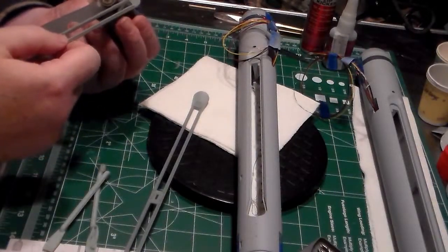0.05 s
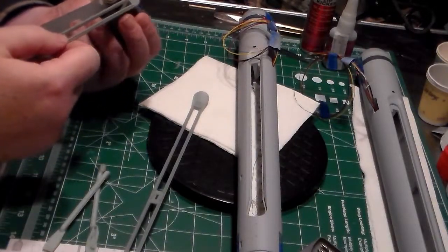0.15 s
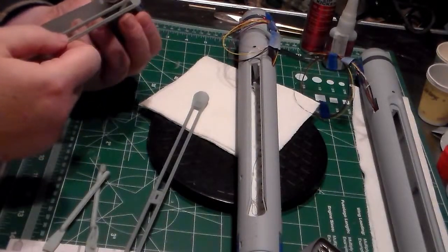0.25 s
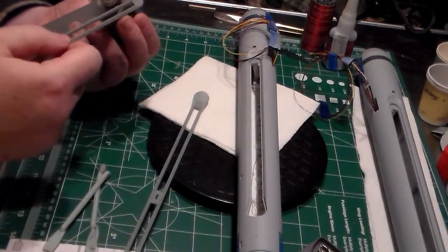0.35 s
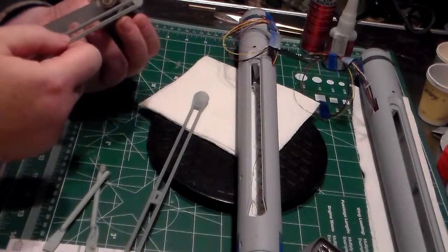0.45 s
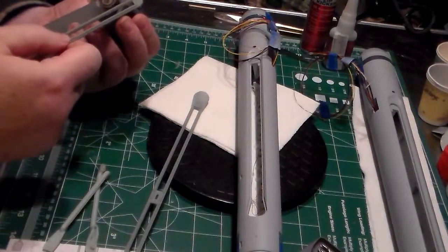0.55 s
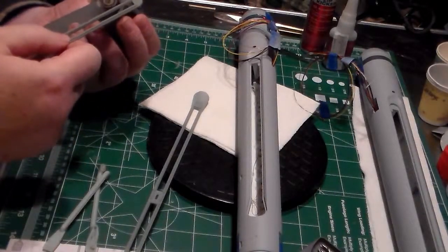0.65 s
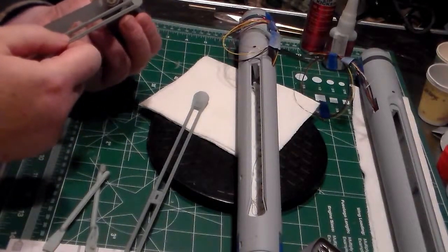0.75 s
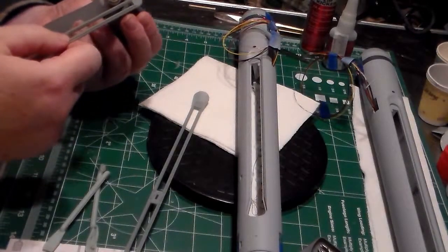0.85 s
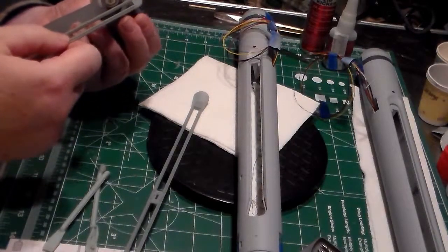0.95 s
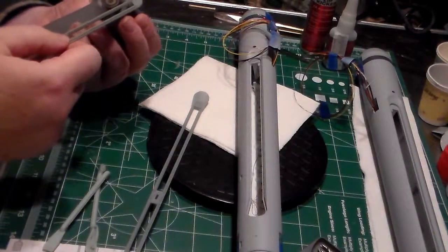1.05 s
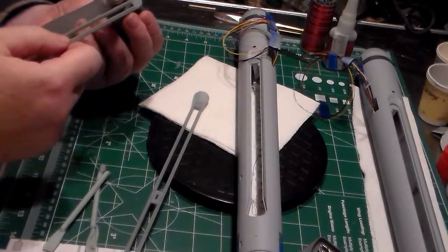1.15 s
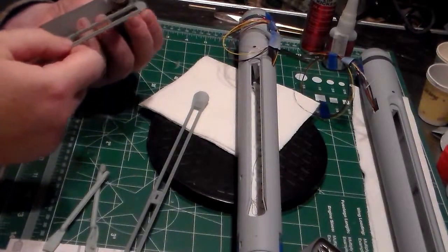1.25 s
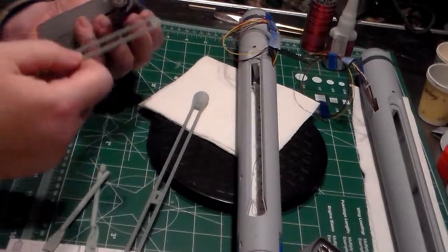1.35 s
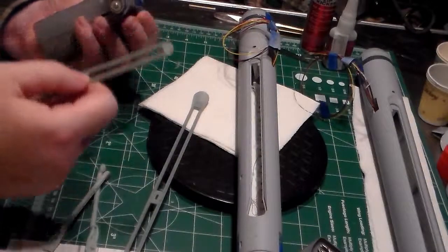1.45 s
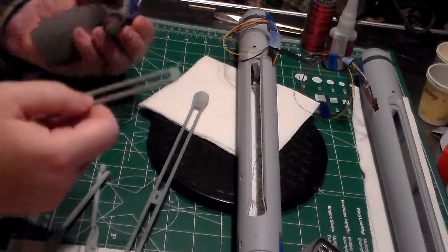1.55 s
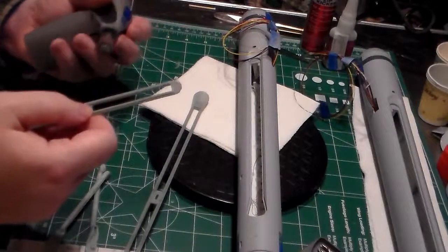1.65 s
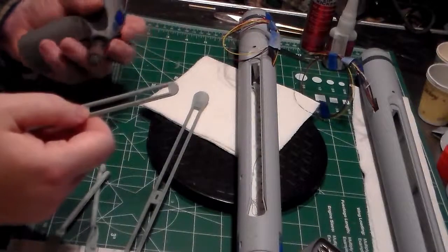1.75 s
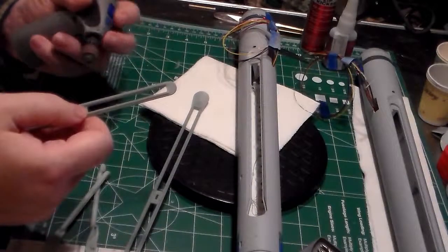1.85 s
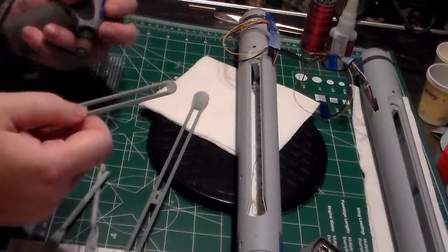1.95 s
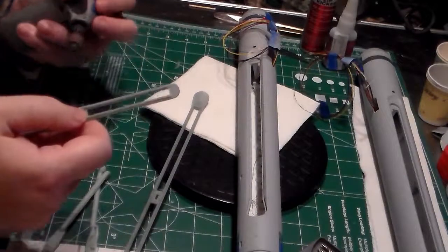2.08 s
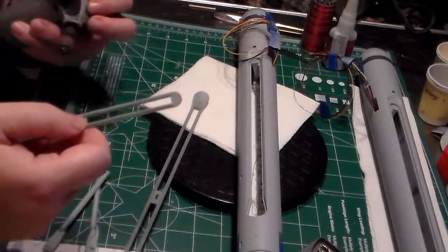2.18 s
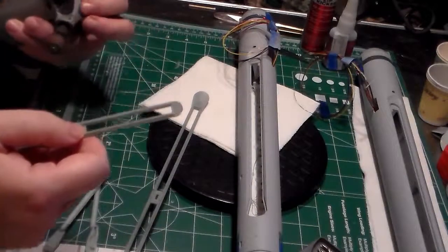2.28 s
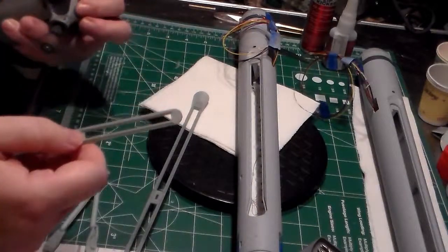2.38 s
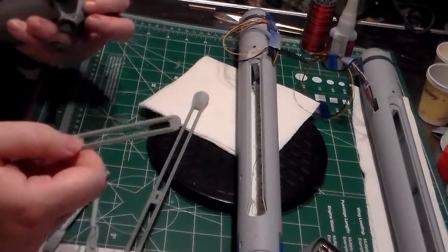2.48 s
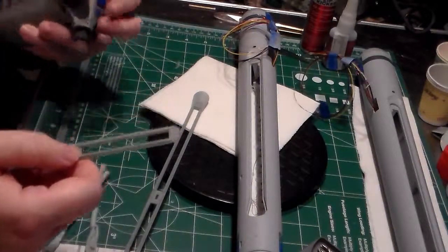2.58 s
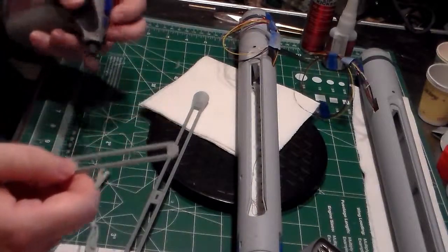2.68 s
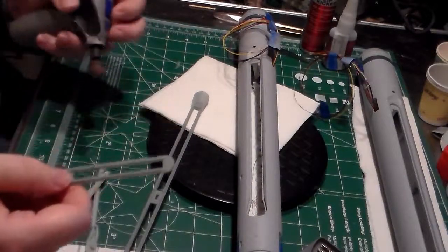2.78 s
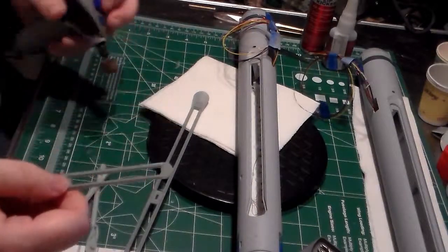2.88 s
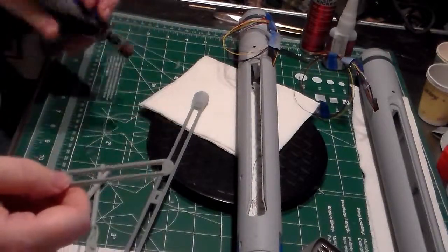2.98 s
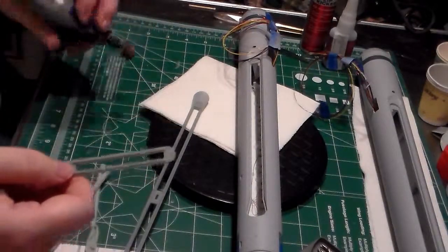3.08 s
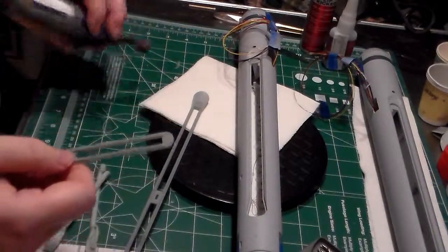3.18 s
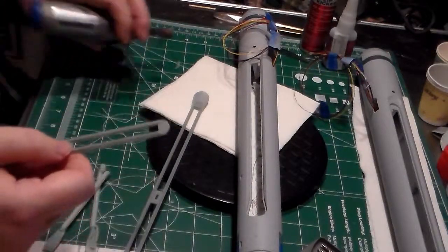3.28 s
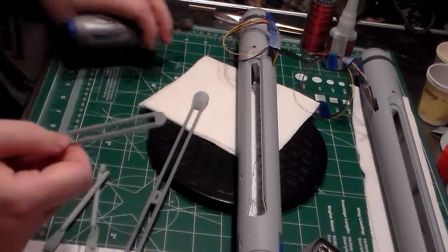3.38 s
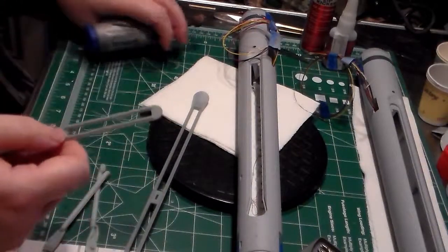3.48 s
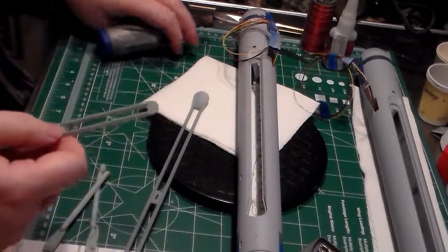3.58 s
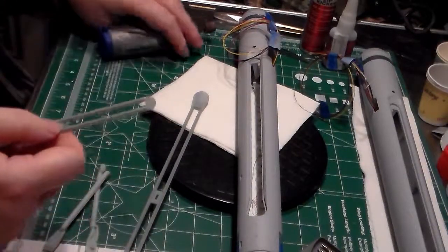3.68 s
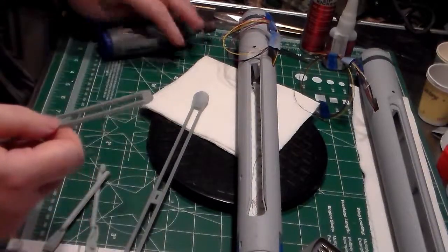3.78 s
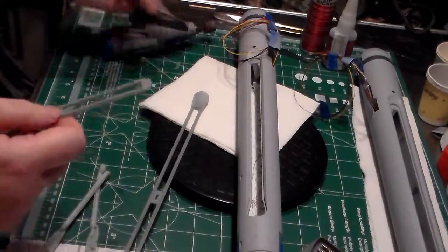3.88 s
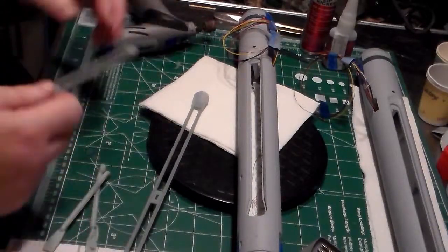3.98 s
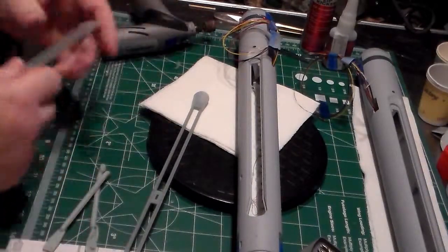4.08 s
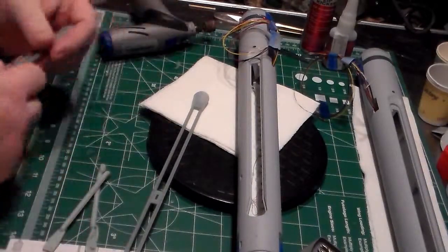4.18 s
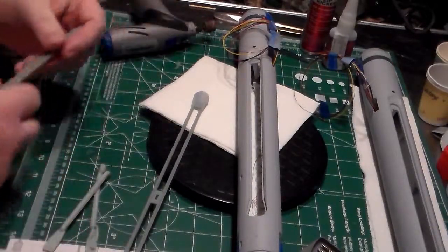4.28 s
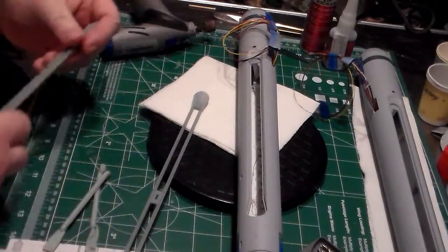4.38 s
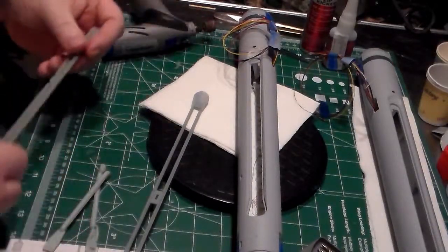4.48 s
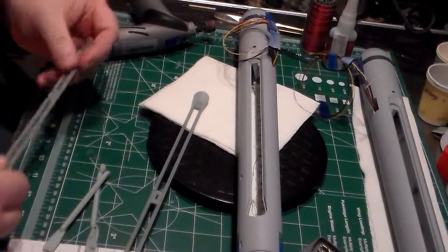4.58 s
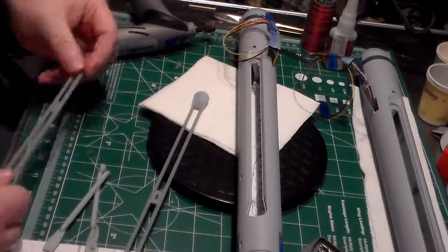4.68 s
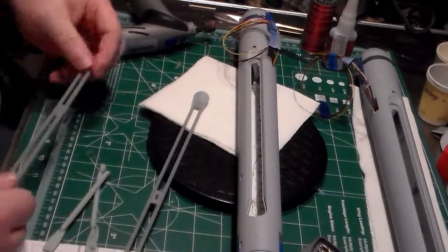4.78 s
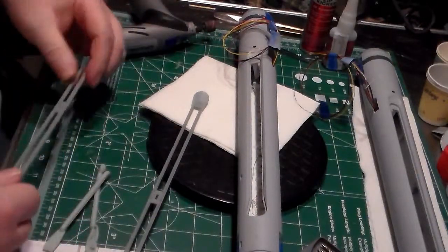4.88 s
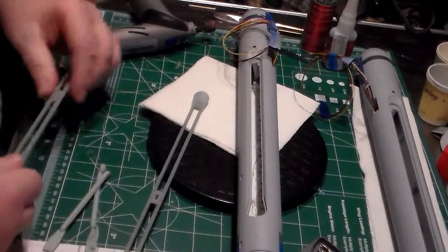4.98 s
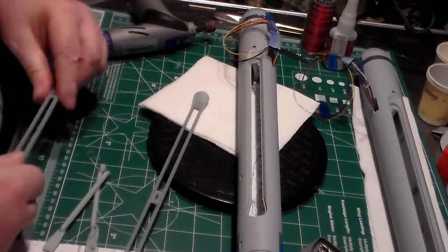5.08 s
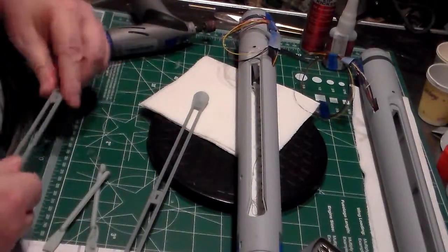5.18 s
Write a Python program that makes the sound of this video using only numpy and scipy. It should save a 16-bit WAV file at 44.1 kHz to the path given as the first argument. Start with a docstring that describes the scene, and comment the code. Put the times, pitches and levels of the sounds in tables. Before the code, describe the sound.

A small rotary tool whines steadily, rasping plastic in brief touches, then whirs down to a stop and is laid on a bench with knocks.

```python
"""Rotary tool on a workbench

A small rotary tool runs; its sanding drum touches a plastic part a few times and sets it ringing.
The tool is turned away and switched off, and its shaft harmonics, howl and rattle fall with the speed.
It is laid on the bench with two main knocks, which excite modes of the housing and the bench.
Fingers slide over the plastic in grains of filtered noise; the small room hums faintly throughout."""
import sys
import numpy as np
from scipy import signal
from scipy.fft import rfft, irfft, next_fast_len
from scipy.io import wavfile

SR = 44100
rng = np.random.default_rng(int(sys.argv[2]) if len(sys.argv) > 2 else 0)


def to_wav(s):
    """Save 16-bit WAV."""
    ch = np.atleast_2d(s).T  # columns
    pcm = np.round(np.clip(ch, -1, 1) * 32767)  # PCM
    wavfile.write(sys.argv[1], SR, pcm.astype(np.int16))


N = 231341
TIME = np.arange(N) / SR
OFF_S = 2.42   # the tool is switched off
CUTOFF_HZ = 14300   # upper limit of the sound

# left-right correlation of the sound field: f/Hz, correlation [-1 to 1]
LIKENESS = [(60, 0.69), (120, 0.57), (230, 0.98), (460, 0.99), (910, 0.97), (1800, 1), (3560, 0.94),
            (7020, 0.38), (13900, 0.15)]
# spectrum of grinding and knocking contacts: f/Hz, relative level/dB
GRIT = [(300, -25), (900, -15.5), (2000, -6), (2800, -3), (3600, 2.5), (5000, -3), (7500, -5), (9000, -8),
        (14000, -10.5)]


def from_db(db):
    """The decibel law: amplitude gain of a level in dB."""
    return 10 ** (np.asarray(db) / 20)


def rms_one(x):
    """Normalization of power: the signal scaled to unit rms."""
    return x / np.sqrt(np.mean(x ** 2) + 1e-20)


def in_time(rows):
    """Linear interpolation of (time, value) rows at every sample."""
    return np.interp(TIME, *np.transpose(rows))


def at_hz(points, hz):
    """A spectrum interpolated on a logarithmic frequency axis."""
    points = np.array(points)
    return np.interp(np.log(np.maximum(hz, 1)), np.log(points[:, 0]), points[:, 1])


def drift(rate):
    """Band-limited random fluctuation: normal values, `rate` a second, joined by straight lines."""
    return np.interp(TIME * rate, np.arange(4096), rng.standard_normal(4096))


def swell(x, centre, width):
    """Gaussian window: a smooth rise to 1 at the centre, and back."""
    return np.exp(-(2 * (x - centre) / width) ** 2)


def noise(spectrum, likeness=LIKENESS):
    """Spectral shaping of random noise: mid and side mixed to a given correlation; stereo, rms 1."""
    size = next_fast_len(N)
    hz = np.arange(size // 2 + 1) * SR / size
    mid, side = rfft(rng.standard_normal((2, size)))
    alike = np.clip(at_hz(likeness, hz), -1, 1)
    both = np.sqrt(1 + alike) * mid + np.sqrt(1 - alike) * side * [[1], [-1]]
    return rms_one(irfft(both * from_db(at_hz(spectrum, hz)), size)[:, :N])


def partial(phase, hz, rough, wander):
    """Random complex modulation: a stereo tone of rms 1 shifts in each ear, as with moving reflections."""
    # level of left minus right: f/Hz, level/dB
    lean = [(60, -0.5), (130, -3), (280, -3.5), (620, -1), (1350, 0.5), (2930, -0.5), (6370, -1),
            (13900, 0)]
    step = 64   # samples between modulation values
    t = TIME[::step]

    def chance(rate):
        values = rng.standard_normal((2, 1024))
        return np.interp(t * rate, np.arange(values.shape[1]), values[0] + 1j * values[1])

    # hz sets only the stereo image; the pitch is in the phase
    alike = np.clip(at_hz(LIKENESS, hz), 0, 1)
    mid = 1 + wander * chance(6.21) + rough * chance(70)
    side = np.sqrt((1 - alike) / (1 + alike)) * chance(3.04)
    balance = from_db(at_hz(lean, hz) * np.array([[.5], [-.5]]))
    both = (mid + side * np.array([[1], [-1]])) * balance
    both = both / np.sqrt(np.mean(abs(both) ** 2) / 2)
    both = np.repeat(both, step, axis=1)[:, :N]
    phase = (phase % (2 * np.pi)).astype(np.float32)
    return both.real * np.cos(phase) + both.imag * np.sin(phase)


def ring(x, modes):
    """Modal resonance: each mode answers with a dying sine, signs alternating."""
    out = 0
    for k, (hz, db, t60) in enumerate(modes):
        radius = from_db(-60 / (t60 * SR))   # decay per sample
        w = 2 * np.pi * hz / SR
        poles = [1, -2 * radius * np.cos(w), radius * radius]
        mode = signal.lfilter([0, np.sin(w)], poles, x + 1e-18)
        out = out + (-1) ** k * from_db(db) * mode
    return out


def grains(per_s, spread_db, life_s):
    """Shot noise: decaying contacts of uneven size at random moments make an envelope of rms 1."""
    sizes = from_db(spread_db * np.minimum(rng.exponential(1, N), 3))
    contacts = (rng.random(N) < per_s / SR) * sizes
    return rms_one(signal.lfilter([1], [1, -np.exp(-1 / (life_s * SR))], contacts + 1e-18))


def flare(order):
    """Selective emphasis: added gain of one harmonic that fades in, holds and fades out."""
    # while the grip or the vents' angle favours a harmonic: start t/s, end t/s, shaft multiple, level/dB
    flares = [(.43, .95, 15, -37), (0.91, 1.57, 21, -42.5), (.92, 1.62, 10, -50), (.92, 1.622, 7, -48.5),
              (1.22, 1.302, 5, -43), (1.418, 1.8, 50, -42), (1.66, 1.976, 7, -36.5),
              (1.85, 2.247, 18, -36.5)]
    fade_s = .06
    out = 0
    for start, end, k, db in flares:
        if round(k) == order:
            inside_s = np.minimum(TIME - start, end - TIME)
            out = out + from_db(db) * np.clip(inside_s / fade_s + .5, 0, 1)
    return out


def background():
    """Superposition of steady sinusoids, wavering in phase, on weakly correlated room noise."""
    # hum and faint fan tones: f/Hz, level/dB
    hum_tones = [(32.3, -54), (59.2, -58), (118.4, -60.5), (479.1, -71.5), (662.1, -67.5), (899.0, -66.5),
                 (1023, -71)]
    # spectrum of the room noise: f/Hz, relative level/dB
    room_colour = [(12, -35), (20, -5.5), (69, -4), (88, -17.5), (123, -10), (149, -13.5), (207, -13),
                   (231, -13), (446, -19), (484, -15), (751, -19.5), (886, -20), (1070, -20), (1860, -21.5),
                   (14200, -31.5)]
    # its left-right correlation: f/Hz, correlation [-1 to 1]
    room_likeness = [(60, 0.4), (180, 0.38), (530, 0.42), (1570, 0.46), (4670, 0.11), (13900, 0.43)]
    room_db = -52
    hum = 0
    for hz, db in hum_tones:
        phase = 2 * np.pi * hz * TIME + rng.uniform(0, 2 * np.pi) + 0.24 * drift(4.3)
        hum = hum + from_db(db) * np.sqrt(2) * np.sin(phase)
    hum = from_db(-3) * hum * from_db([[-.7], [.7]])   # the right ear hears more of it
    return hum + from_db(room_db) * noise(room_colour, room_likeness)


def whine(angle, shaft_hz, turn, slowing_db):
    """Harmonic series of rotation: clean low orders from the rotor, rougher high ones from the brushes."""
    # shaft harmonics with the tool facing and turned away: shaft multiple, relative level/dB
    facing = [(1, -23.5), (2, -16.5), (3, -10.5), (4, -12), (5, -4.5), (6, -6), (7, -11.5), (8, -13),
              (9, -16), (10, -16), (11, -15), (12, -8.5), (13, -8), (14, -10), (15, 4.5), (16, -3.5),
              (17, -2.5), (18, 0.5), (19, -3.5), (20, -11), (21, -5.5), (22, -6), (23, -6), (24, -14)]
    away = [(1, -22.5), (2, -23), (3, -10.5), (4, -14), (5, -9.5), (6, -14.5), (7, 0), (8, -11), (9, -7.5),
            (10, -0.5), (11, -14), (12, -3), (13, -13), (14, -14), (15, -14), (16, -2.5), (17, -1),
            (18, 3.5), (19, -4), (20, -11), (21, -9), (22, -7), (23, -31.5), (24, -8)]
    # spectrum of the brush harmonics: f/Hz, relative level/dB
    brush_colour = [(2940, -34), (5000, -4), (5650, -11), (6300, -0.5), (6910, -12), (8010, -11),
                    (9260, -9), (9750, 2), (10300, -4), (11200, -6.5), (11800, -5.5), (14200, -10.5)]
    facing_db, away_db, brush_db = -39.5, -39.5, -38.5
    beamed_orders = 7, 15, 18   # beamed from the vents, they arrive direct and steady
    rotor, count = 0, len(facing)
    for k, ((_, near_db), (_, far_db)) in enumerate(zip(facing, away), 1):
        level_db = (1 - turn) * (facing_db + near_db) + turn * (away_db + far_db)
        gain = np.hypot(from_db(level_db), flare(k))
        wander = .07 if k in beamed_orders else 0.45 * np.sqrt(k / count)
        # dB lost per dB of speed lost: high harmonics die first
        fade = from_db(slowing_db * (.9 + 0.81 * k))
        phase = k * angle + rng.uniform(0, 2 * np.pi)
        rotor = rotor + gain * fade * partial(phase, k * shaft_hz, rough=0.26 * k / count, wander=wander)
    brushes = 0
    for k in np.arange(count + 1, CUTOFF_HZ // shaft_hz):
        hz = k * shaft_hz
        phase = k * angle + rng.uniform(0, 2 * np.pi)
        tone = partial(phase, hz, rough=.5 * (hz / 9000) ** 2, wander=0.68)
        brushes = brushes + from_db(at_hz(brush_colour, hz) + rng.normal(0, 1.9)) * tone
    return rotor + rms_one(brushes) * from_db(brush_db + 2.2 * turn + 11 * slowing_db)


def controller(angle):
    """Amplitude-modulation sidebands: chopped current sings at a fixed pitch; the rotor adds side tones."""
    # carrier and sidebands: offset in shaft multiples, level/dB with the tool facing
    chopper = [(-3, -58.5), (-1, -57.5), (0, -45), (1, -61.5), (3, -52)]
    chopper_hz = 1512
    carrier = 2 * np.pi * chopper_hz * TIME
    tones = 0
    for k, db in chopper:
        tones = tones + from_db(db) * partial(carrier + round(k) * angle, chopper_hz, rough=0.094, wander=0.024)
    return tones * np.clip((OFF_S - TIME) / 0.0094, 0, 1)


def rush(angle, turn, coasting, slowing_db, shudder_db):
    """Modulated broadband noise: bearings and brushes swell once a turn; the whirling shaft rattles."""
    # bearing noise with the tool facing and turned away: f/Hz, relative level/dB
    air_facing = [(100, -34), (200, -34), (500, -22.5), (800, -17.5), (1200, -14.5), (1700, -9.5),
                  (2200, -12.5), (2700, -5), (3300, -4.5), (3700, -2), (4500, -6), (5200, -11),
                  (6300, -11.5), (7500, -17), (10000, -53)]
    air_away = [(150, -55), (250, -30), (409, -17), (539, -14), (597, -13), (833, -12), (991, -3.5),
                (1210, -7), (1470, -0.5), (1620, -5), (1900, -2), (2860, -4.5), (3450, -3.5), (6070, -13.5),
                (8000, -19.5), (10400, -33), (17600, -120)]
    # brush hiss, and chatter of the tipped shaft: f/Hz, relative level/dB
    hiss_colour = [(4120, -36), (7000, -18), (7810, -12.5), (9030, -6), (9470, -9.5), (10100, 0.5),
                   (10600, -7), (10900, -7), (12200, -12), (14200, -18.5)]
    chatter_colour = [(2000, -40), (3000, -25), (3400, -5), (3800, -8.5), (4200, -12.5), (7500, -25.5),
                      (14000, -38)]
    # levels at full speed under power
    facing_db, away_db, hiss_db, chatter_db = -34, -37.5, -40, -37
    # dB lost for each dB of shaft speed lost
    air_fall, hiss_fall, chatter_fall = 0.86, 1.02, 2.2

    once_a_turn = rms_one(np.exp(0.13 * np.cos(angle)))
    whirl = 0.55 * np.cos(angle / 4 + 0.67 * drift(24))   # one cycle in four turns
    rattle = from_db(turn * (whirl + 0.74 * drift(120)))

    near = np.sqrt(1 - turn) * noise(air_facing) * from_db(facing_db)
    far = np.sqrt(turn) * noise(air_away) * from_db(away_db)
    bearings = (near + far) * from_db(air_fall * slowing_db + shudder_db - 0.47 * coasting)
    brushes = noise(hiss_colour) * from_db(hiss_db + hiss_fall * slowing_db + 1.3 * coasting)
    looseness = np.clip(1.8 * turn, 0, 1) ** 3   # the shaft starts to chatter as the tool tips over
    chatter_gain = from_db(chatter_db + chatter_fall * slowing_db - 2.3 * coasting)
    chatter = noise(chatter_colour) * looseness * chatter_gain
    return (bearings + brushes + chatter) * once_a_turn * rattle


def rasp(angle):
    """Forced resonance: grit bites hardest at one side of each turn and sets the plastic part ringing."""
    # drum pressed on the plastic: t/s, length/s, pressure gain/dB, ringing of the part f/Hz
    touches = [(0.262, 0.03, -32, 3250), (0.906, .042, -27.5, 3480), (0.981, 0.045, -29, 2730),
               (1.264, 0.085, -30.5, 2737)]
    part_t60_s, part_share = 0.046, .85
    bite_s = .018   # the drum takes this long to bite and to let go
    bite = rms_one(np.exp(0.38 * np.cos(angle) + 0.26 * drift(700)))
    grit, out = noise(GRIT) * bite, 0
    for s, length, db, hz in touches:
        pressure = from_db(db) * np.clip((length / 2 - abs(TIME - s)) / bite_s + .5, 0, 1)
        part = rms_one(ring(grit, [(hz, 0, part_t60_s)]))
        out = out + pressure * (0.98 * grit + part_share * part)
    return out


def squeal(angle, shaft_hz):
    """Resonant excitation: two neighbouring harmonics make the brush springs sing as the vents sweep by."""
    squeal_s, length_s, squeal_db = 1.86, 0.59, -37
    sweep = from_db(squeal_db) * swell(TIME, squeal_s, length_s) / np.sqrt(2)
    out = 0
    for k in (49, 50):
        gain = np.hypot(sweep, flare(k))
        out = out + gain * partial(k * angle, k * shaft_hz, rough=0.26, wander=0.35)
    return out


def howl(angle, speed):
    """Swept resonance: the whirling shaft's falling tone swells at each body mode and breaks up."""
    # body resonances: f/Hz, width/Hz, level/dB
    resonances = [(1490, 140, -38.5), (1003, 145, -43.5), (760, 160, -48.5)]
    order = 9   # multiple of the shaft speed
    ragged = np.interp(TIME, [2.56, 2.7], [.3, 1])
    middle = partial(order * angle + ragged * drift(160), 1000, rough=.4, wander=.1)
    flanks = 0
    for step in (-1, 1):
        flanks = flanks + partial((order + step) * angle + drift(150), 1000, rough=2.5, wander=0.092)
    gain = 0
    for hz, width, db in resonances:
        gain = gain + from_db(db) / (1 + (2 * (order * speed - hz) / width) ** 2)
    return gain * (middle + .5 * ragged * flanks)


def rattle_down(angle, slowing_db, shudder_db):
    """Periodic impact: the loose shaft knocks once a turn, slower and softer, and rings its bearing seat."""
    # modes of the bearing seat: f/Hz, relative level/dB, t60/s
    bearing_seat = [(1480, 1, 0.041), (1964, -5, 0.14), (2430, -5, 0.033), (3290, -6, 0.029),
                    (3630, -6.5, 0.022), (4350, -5, 0.029)]
    rattle_db, rattle_fall = -39, 1.15   # level at full speed; dB lost per dB of speed lost
    knocking = noise(GRIT) * np.exp(0.52 * np.cos(angle))
    gain = from_db(rattle_db + rattle_fall * slowing_db + shudder_db)
    return gain * rms_one(ring(knocking, bearing_seat))


def handling():
    """Stick-slip friction: skin slides on the plastic in small grains; the part ticks now and then."""
    # spectrum of the sliding skin: f/Hz, relative level/dB
    skin_colour = [(400, -7), (1000, -3.5), (3000, -2.5), (5000, -5), (7500, -2.5), (10000, -2),
                   (14000, -5.5)]
    # strokes of skin on plastic: centre t/s, length/s, pressure gain/dB
    strokes = [(3.45, 1, -58.5), (4, 0.035, -44.5), (4.56, .18, -63), (4.885, 0.26, -53.5),
               (5.085, 0.23, -57)]
    # the part ticking between the fingers: t/s, peak level/dB, f/Hz
    ticks = [(3.15, -46, 3730), (3.415, -41.5, 1900), (3.997, -38, 3320), (4.48, -45, 5200),
             (4.595, -45, 2000), (4.83, -47, 9000), (5.119, -42, 2480)]
    slips = 0.75 + 0.34 * grains(per_s=250, spread_db=3, life_s=0.0028)
    pressure = sum(from_db(db) * swell(TIME, s, length) for s, length, db in strokes)
    out = noise(skin_colour) * pressure * from_db(1.2 * drift(40)) * slips
    for s, db, hz in ticks:
        touch = rng.standard_normal((2, N)) * np.exp(-abs(TIME - s) / 0.011) * (TIME > s)
        tick = ring(touch, [(hz, 0, .003)])
        out = out + from_db(db) * tick / np.abs(tick).max()
    return out


def room(x, early_db, late_db):
    """Reverberation: quick reflections off the cluttered bench, then the room's diffuse tail."""
    t = TIME[:SR // 2]

    def tail(t60, delay):
        h = rng.standard_normal((2, len(t))) * from_db(-60 * t / t60) * (t > delay)
        h = h + 0.57 * h[::-1]   # each ear shares part of the other's tail
        return h / np.sqrt(np.sum(h ** 2) / 2)

    early = from_db(early_db) * tail(t60=0.078, delay=0.0016)
    late = from_db(late_db) * tail(t60=0.51, delay=0.013)
    return x + signal.fftconvolve(x[None], early + late, axes=1)[:, :N]


def knocks():
    """Impact excitation of modes: the housing lands and buzzes, then its other end thumps the bench."""
    # contacts as the tool is laid down: t/s, housing impulse/dB, bench impulse/dB, contact edge f/Hz
    landings = [(3.6105, -14.5, -37, 3500), (3.6164, -35, -42, 5000), (3.6225, -43, -41, 5000),
                (3.634, -35, -54, 4000), (3.665, -33, -51, 4000), (3.755, -46, -52, 2500),
                (3.794, -35, -49, 2500), (3.863, -24.5, -22, 2000), (3.868, -25, -47, 2500),
                (3.876, -27, -25.5, 1500), (3.893, -49, -31, 1500)]
    # modes of the housing and of the bench: f/Hz, relative level/dB, t60/s
    housing_modes = [(1110, -13, 0.02), (1237, -15.5, 0.03), (1510, -9.5, 0.032), (1640, -6.5, 0.023),
                     (1760, -1.5, 0.02), (1930, -5.5, 0.027), (2450, -10, 0.022), (2616, -11, 0.043),
                     (2870, -19, 0.043), (3120, -16, .03), (3600, -17, .01), (4240, -17, .018),
                     (5170, -26, 0.01), (6100, -22, 0.011), (7150, -23, .01)]
    bench_modes = [(126.4, -16, 0.15), (162, -12.5, 0.12), (196, -11, 0.245), (242, -12, 0.065),
                   (302, -7, 0.037), (439, -11.5, 0.081), (543, -10, 0.054), (694, -10, 0.06),
                   (970, -16.5, 0.041)]
    # small parts buzzing inside the housing after a landing: t/s, initial gain/dB, t60/s
    settling = [(3.611, -35.5, 0.73), (3.863, -32.5, 0.13)]
    # spectrum of that buzz: f/Hz, relative level/dB
    buzz_colour = [(150, -4.5), (450, -2.5), (800, -14), (1300, -1.5), (1800, -1.5), (2200, -5), (2650, -2),
                   (3500, -7), (4300, -11.5), (5000, -13), (7000, -15.5), (9000, -19), (14000, -24)]
    housing, bench = np.zeros((2, N))
    for s, housing_db, bench_db, edge_hz in landings:
        at = round(s * SR)
        push = np.exp(-2 * np.pi * edge_hz * TIME[:SR // 100])
        push = push / push.sum()
        housing[at:at + len(push)] += from_db(housing_db) * push
        bench[at:at + len(push)] += from_db(bench_db) * push
    dying = sum(from_db(db - 60 * abs(TIME - s) / t60) * (TIME > s) for s, db, t60 in settling)
    buzz = noise(buzz_colour) * dying * (0.51 + 0.51 * grains(per_s=350, spread_db=3.0, life_s=0.0043))
    shell = room(ring(housing, housing_modes) + 0.68 * housing, early_db=-3.5, late_db=-18)
    return shell + buzz + room(ring(bench, bench_modes), early_db=-3.0, late_db=-14)


def scene():
    """Rotational coupling: the shaft's speed and the turn of the hand drive the tool's sounds."""
    # motor under power, sagging around the drum's touches: t/s, shaft turns per second/Hz
    motor_speed = [(0.0, 206.1), (0.3, 208.8), (0.32, 207.9), (0.87, 209.5), (0.97, 206.3), (1.22, 208.0),
                   (1.3, 205.7), (1.39, 206.8), (2.1, 209.6), (2.41, 209.1)]
    shaft_hz = np.mean(np.array(motor_speed)[:, 1])

    # friction slows the shaft over 0.725 s; a power above 1 eases the last turns
    share = np.clip(1 - (TIME - OFF_S) / .725, 1e-3, 1) ** 1.19
    speed, slowing_db = in_time(motor_speed) * share, 20 * np.log10(share)
    angle = 2 * np.pi * np.cumsum(speed * (1 + 0.00041 * drift(40.2))) / SR

    # the hand swings the tool away from the part in one even move
    turn_start_s, turn_length_s = 1.54, 0.71
    turn = np.clip((TIME - turn_start_s) / turn_length_s, 0, 1)
    coasting = np.clip((TIME - OFF_S) / 0.028, 0, 1)

    # the shaft shudders at its critical speed (Hz) and jolts as the switch slides off (s)
    shudder_db = 5 * swell(speed, centre=113, width=24) + 3 * swell(TIME, centre=2.41, width=.06)
    # unsteadiness of the shaft angle in radians: when tipped over, and added when coasting
    jitter = (0.0089 * turn + 0.051 * coasting) * drift(200)

    tones = whine(angle + jitter, shaft_hz, turn, slowing_db) + controller(angle) * from_db(-2.5 * turn)
    tones = tones + squeal(angle, shaft_hz) + coasting * howl(angle, speed)
    noisy = rush(angle, turn, coasting, slowing_db, shudder_db) + rasp(angle)
    noisy = noisy + coasting * rattle_down(angle, slowing_db, shudder_db)
    audible = np.clip((3.08 - TIME) / 0.092, 0, 1)   # the tool's sound fades out by 3.08 s
    tool = audible * (tones + noisy * from_db([[-.6], [.6]]))
    return background() + tool + handling() + knocks()


def record(dry):
    """Elliptic low-pass filtering: the top is cut steeply."""
    lowpass = signal.ellip(12, .1, 80, CUTOFF_HZ, fs=SR, output="sos")
    return signal.sosfilt(lowpass, dry)


dry = scene()
out = record(dry)
to_wav(out)
```